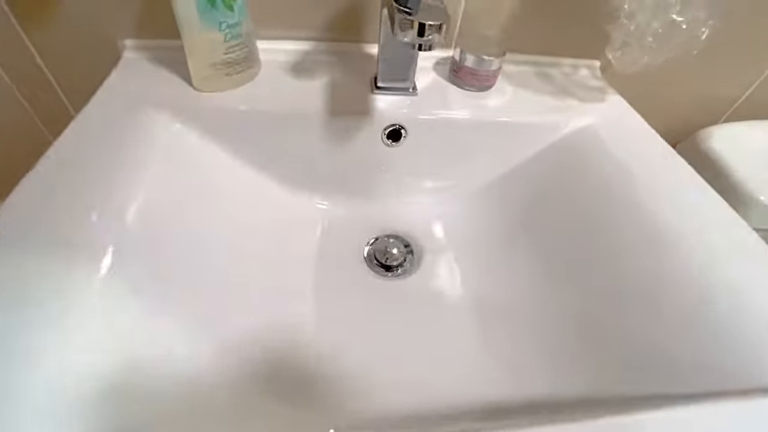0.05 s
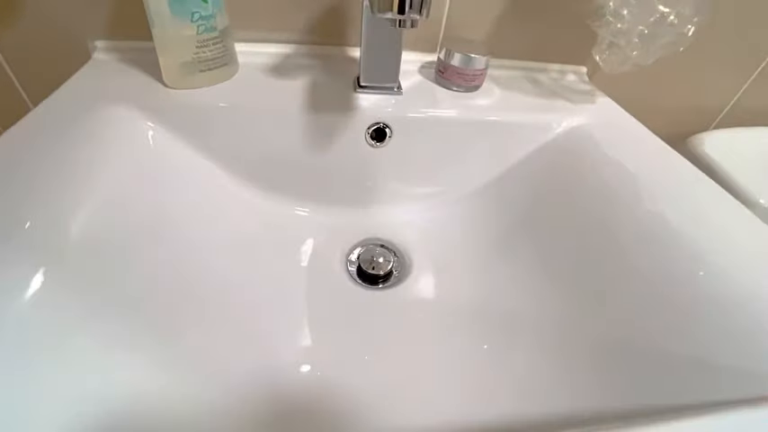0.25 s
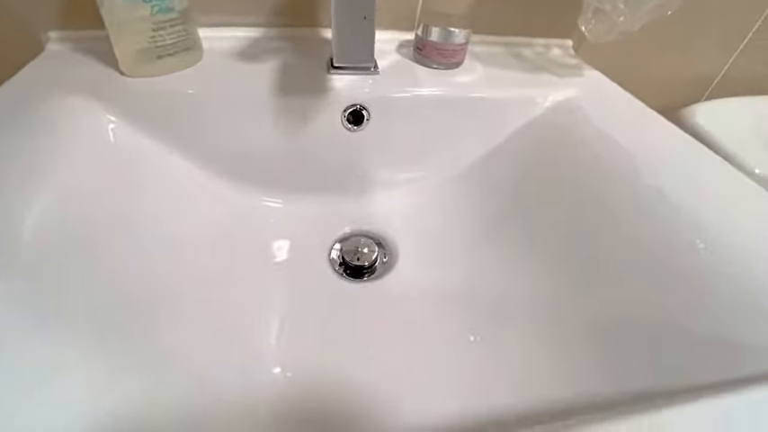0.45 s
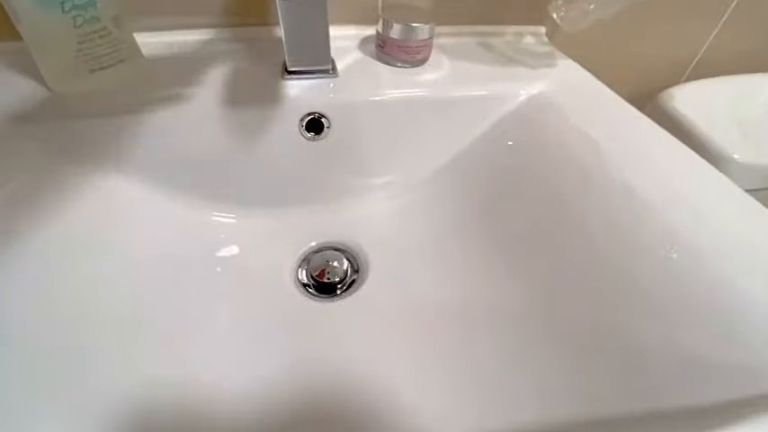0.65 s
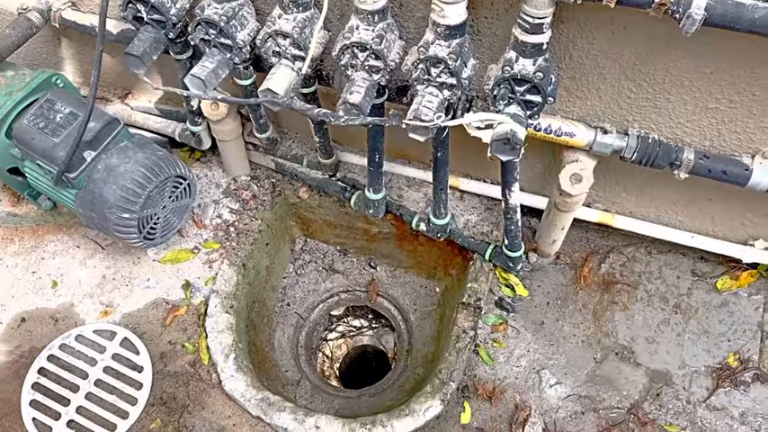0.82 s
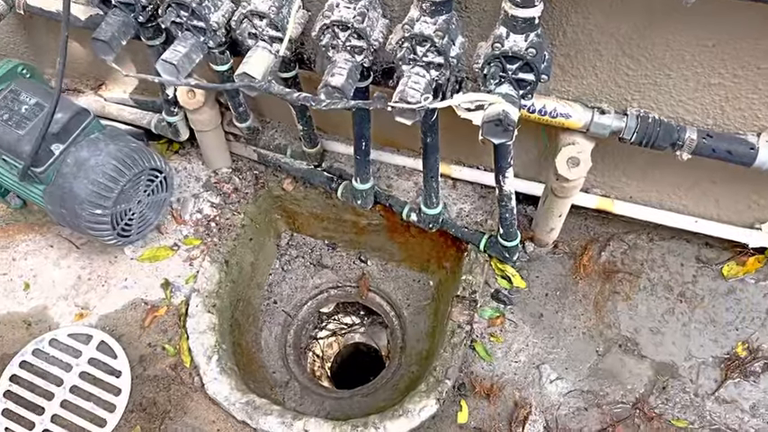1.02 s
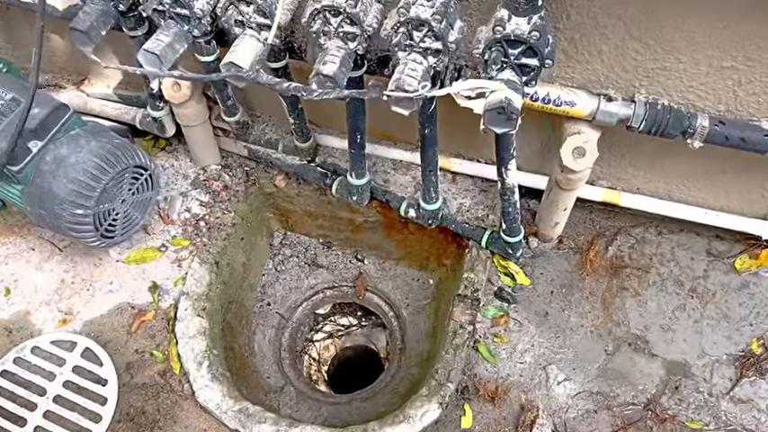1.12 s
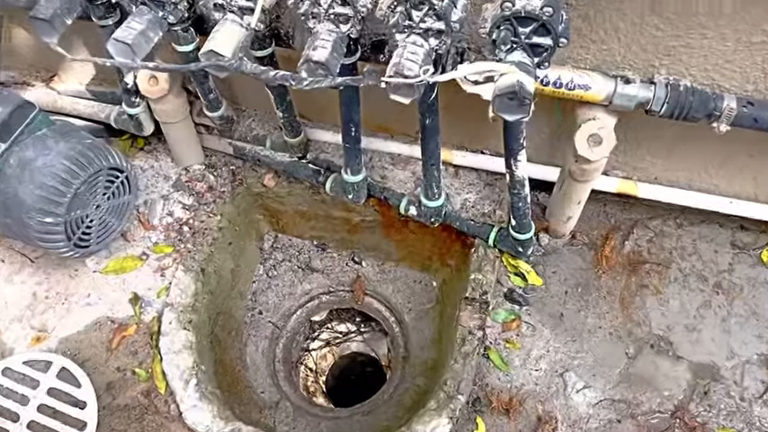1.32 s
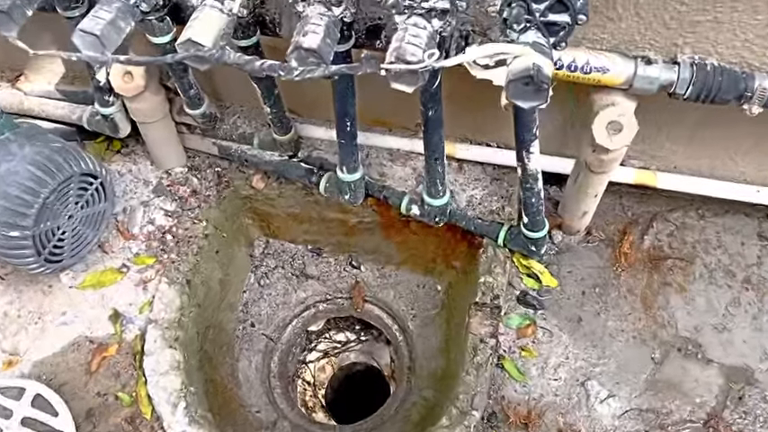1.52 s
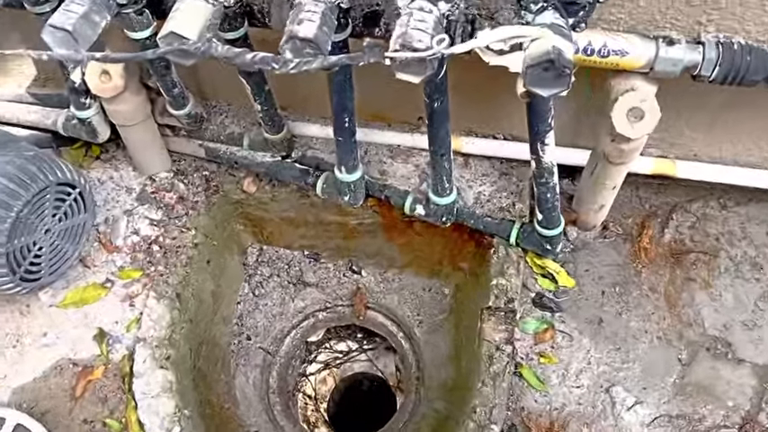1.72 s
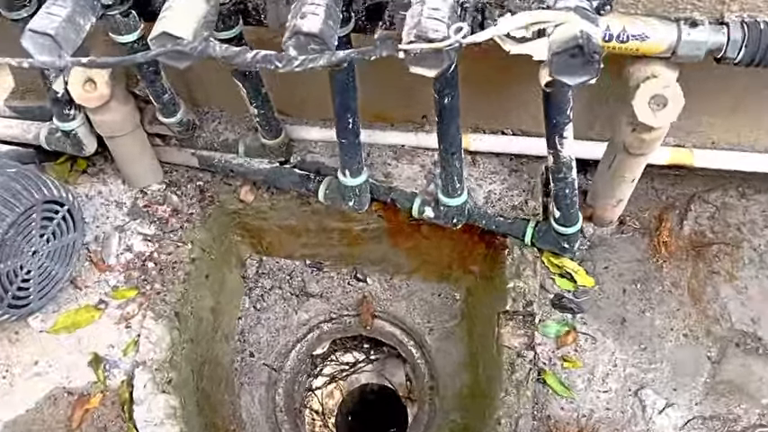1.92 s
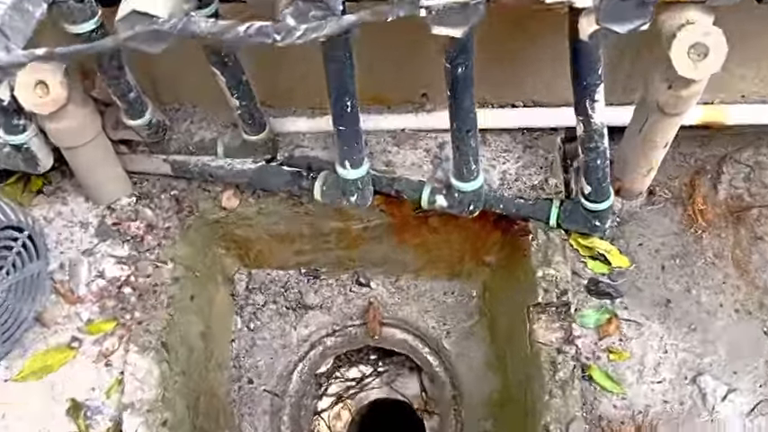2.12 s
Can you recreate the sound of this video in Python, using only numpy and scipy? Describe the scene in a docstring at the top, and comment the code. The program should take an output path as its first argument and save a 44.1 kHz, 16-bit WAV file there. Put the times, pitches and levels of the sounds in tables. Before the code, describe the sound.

A basin drain gurgles briefly, followed by faint outdoor scuffs, drips and a distant hum.

```python
"""Water gurgles down the waste of a basin in a small tiled bathroom: each gulp of air rings a low
pocket and the neck of the pipe and throws spatter, while small bubbles pop over the churning trap.
After a short silence comes a quiet yard by an open drain: shoes scuff on gritty concrete and
drips plop over still air and the low hum of a distant motor. The yard drops out once, briefly."""
import sys
import numpy as np
from scipy import signal
from scipy.fft import rfft, irfft
from scipy.io import wavfile
from scipy.ndimage import map_coordinates

SR = 44100
rng = np.random.default_rng(int(sys.argv[2]) if len(sys.argv) > 2 else 0)


def output_pcm(signal):
    """Save a mono or channel-first signal as 16-bit PCM at the path in sys.argv[1].

    Samples are clipped to [-1, 1] before scaling.
    """
    pcm = np.clip(np.atleast_2d(signal).T, -1, 1) * 32767
    wavfile.write(sys.argv[1], SR, np.round(pcm).astype(np.int16))


N = 94815
T = np.arange(N) / SR
FREQS = np.maximum(np.fft.rfftfreq(N, 1 / SR), 1)
DROPLETS_PER_S = 4500

# Air gulps in the waste: (time [s], pocket pitch [Hz], pocket level [dB], neck pitch [Hz],
# neck level [dB], relative spatter level [dB], relative spray level [dB])
GULPS = [(0.228, 153, -41.5, 500, -67, -62, -82), (0.243, 144.4, -33.5, 530, -42, -62.5, -72.5),
         (0.266, 134.3, -34, 880, -50, -68, -71), (0.289, 319, -32, 590, -34.5, -55.5, -76.5),
         (0.3176, 249, -27, 667, -36.5, -52.5, -77.5), (0.333, 261, -26.5, 500, -46, -62.5, -77),
         (0.341, 476, -25, 680, -27.5, -50.5, -72), (0.351, 265, -35.5, 780, -38, -67.5, -70),
         (0.373, 346, -27, 698, -25.5, -43.5, -61), (0.395, 327, -32.5, 662, -42, -58, -62.5),
         (0.421, 326, -26, 1130, -40.5, -33.5, -54), (0.443, 542, -31.5, 834, -32, -39, -58.5),
         (0.461, 417, -32, 799, -24, -31, -62), (0.482, 323, -35.5, 812, -43, -44, -61.5),
         (0.488, 338.4, -25.5, 690, -46, -63.5, -75.5), (0.503, 345.5, -30.5, 796, -41.5, -50, -49.5),
         (0.538, 332, -30.5, 800, -31, -35.5, -54.5), (0.560, 331, -32.5, 806, -34, -55, -72),
         (0.576, 309, -31, 885, -49, -43.5, -66.5), (0.6, 344, -19.5, 865, -26, -37, -54.5),
         (0.629, 459, -28.5, 847, -30.5, -37, -54.5), (0.649, 345, -18, 873, -30.5, -32, -61.5),
         (0.667, 317, -33, 900, -45.5, -33.5, -58), (0.684, 402, -39.5, 786, -48.5, -63.5, -88.5),
         (0.716, 266.5, -39, 880, -39, -72, -74)]
# Stereo image of each space: (frequency [Hz], left-right likeness [1 = mono])
BATHROOM_IMAGE = [(60, 1), (330, 0.72), (750, 0.39), (1500, 0.029), (4400, 0.061), (15000, -1.1)]
YARD_IMAGE = [(60, 0.94), (200, 0.89), (700, 0.43), (2400, 0.68), (4400, 0.19), (8000, 0.52),
              (14000, -0.27)]


def from_db(db):
    """Decibels to gain."""
    return 10 ** (np.asarray(db) / 20)


def rms_one(x):
    """Scale to unit power."""
    return x / np.sqrt(np.mean(x ** 2) + 1e-20)


def at_hz(points):
    """Read a curve on a log-frequency axis."""
    hz, value = np.transpose(points)
    return np.interp(np.log(FREQS), np.log(hz), value)


def panned(x, pan_db):
    """Place a sound; positive is left."""
    return x * from_db(np.array([[pan_db], [-pan_db]]) / 2)


def from_left(x, lag_s=0.00012):
    """Sound from the left reaches the right microphone a little later."""
    return np.array([x[0], irfft(rfft(x[1]) * np.exp(-2j * np.pi * FREQS * lag_s), N)])


def white():
    """Two unrelated noises."""
    return rng.standard_normal((2, N))


def flutter(width_hz):
    """Two unrelated random wobbles, mostly slower than width_hz."""
    return rms_one(irfft(rfft(white()) * np.exp(-(FREQS / width_hz) ** 2), N))


def grains(per_s):
    """Two trains of random clicks of uneven size, unit power."""
    return rms_one(white() * (rng.random(N) < per_s / SR))


def causal(gain):
    """The filter with these gains that rings only after its input."""
    cepstrum = irfft(np.log(gain + 1e-9), N)
    lag = np.arange(N)
    return np.exp(rfft(cepstrum * (1 + np.sign(lag)) * (lag < N // 2)))


def colour(pair, spectrum, image):
    """Give two unrelated signals a spectrum and a stereo width, keeping their power."""
    mid, side = rfft(pair) * causal(rms_one(from_db(at_hz(spectrum))))
    alike = np.clip(at_hz(image), -.99, .99)
    return irfft(np.sqrt((1 + alike) / 2) * mid + np.sqrt((1 - alike) / 2) * side * [[1], [-1]], N)


def narrow_noise(hz, width_hz):
    """A wavering band of noise round a steady or moving pitch."""
    a, b = flutter(width_hz)
    phase = 2 * np.pi * np.cumsum(hz * np.ones(N)) / SR
    return a * np.cos(phase) + b * np.sin(phase)


def patchy(x, depth_db, patch_s=.035, patch_hz=222.6, full_depth_hz=1190):
    """Short-lived bright spots come and go at random pitches."""
    hz, s, bins = signal.stft(x, SR, nperseg=512)
    grid = np.meshgrid(hz / patch_hz, s / patch_s, indexing="ij")
    spots = map_coordinates(rng.standard_normal(size=(256, 256)), grid, order=2, mode="wrap")
    gain = rms_one(from_db(depth_db * spots * np.minimum(hz / full_depth_hz, 1)[:, None]))
    return signal.istft(bins * gain, SR, nperseg=512)[1][:, :N]


def strike(s, attack, t60):
    """A quick swell and an exponential decay, height 1."""
    age = np.maximum(T - s, 0)
    shape = (1 - np.exp(-(age / attack) ** 2)) * from_db(-60 * np.minimum(age / t60, 2))
    return shape / (shape.max() + 1e-12)


def swell(s, half):
    """A bell-shaped stroke, height 1."""
    return np.exp(-np.minimum(((T - s) / half) ** 2 / 2, 20))


def gate(start, end, fade_in_s=.01, fade_out_s=0.0012):
    """Open between two moments, with short fades."""
    return np.clip((T - start) / fade_in_s, 0, 1) * np.clip((end - T) / fade_out_s, 0, 1)


def bubble(s, hz, db, attack, t60, rise_per_s, squeeze=0):
    """A ringing air pocket: its pitch rises as it nears the surface and wobbles when it is squeezed."""
    age = np.clip(T - s, 0, 2 * t60)
    pitch = hz * (1 + rise_per_s * age + 0.053 * squeeze) * (T > s)
    return from_db(db + squeeze) * strike(s, attack, t60) * np.sin(2 * np.pi * np.cumsum(pitch) / SR)


def reverb(x, spectrum, image, t60):
    """Dense reflections that die away, as strong as the sound itself."""
    decay = strike(0.0011, 0.00099, t60)
    response = colour(white(), spectrum, image) * decay / np.sqrt(np.sum(decay ** 2))
    return signal.fftconvolve(x.mean(axis=0)[None], response[:, :SR // 2], axes=1)[:, :N]


def room_tone():
    """The faint rumble and hiss of the bathroom."""
    # Room tone colour: (frequency [Hz], relative level [dB])
    tone = [(18, -46), (30, -27), (260, -9), (328, -22), (953, -17.5), (1270, -16), (1480, -16.5),
            (2700, -16.5), (15000, -36)]
    return from_db(-68) * colour(white(), tone, BATHROOM_IMAGE)


def yard_air():
    """Still outdoor air: a low rumble under a flickering hiss."""
    # Colour of the outdoor hiss as heard through the microphone, with a narrow notch at 12.5 kHz:
    # (frequency [Hz], relative level [dB])
    tone = [(18, -28.5), (30, -7.5), (180, -9), (288, -17.5), (928, -24), (2990, -27), (3230, -27.5),
            (4090, -28), (5880, -34.5), (8470, -34), (10700, -33.5), (12500, -56), (15000, -33.5)]
    return from_db(-63) * patchy(colour(white(), tone, YARD_IMAGE), depth_db=5.0)


def motor_hum():
    """A distant motor drones in three wavering bands, off to the right."""
    # Hum bands: (pitch [Hz], relative level [dB], width [Hz])
    bands = [(54, -69.5, 11), (149.8, -68, 15.3), (330, -81, 19)]
    # Slow drift of the hum: (time [s], gain [dB])
    drift = [(.85, -3), (1.15, 1), (1.3, 4), (1.5, 5), (1.62, 2.5), (2.15, 4)]
    hum = sum(from_db(db) * narrow_noise(hz, width) for hz, db, width in bands)
    return panned(hum * from_db(np.interp(T, *np.transpose(drift))), pan_db=-4.0)


def drips():
    """Drips plop in the open drain, each ringing as a bubble."""
    # Plops: (time [s], pitch [Hz], level [dB], ring time to -60 dB [s])
    plops = [(1.134, 4050, -56, 0.092), (1.223, 4100, -64, .05), (1.282, 1322, -55, 0.041),
             (1.36, 854, -48.5, 0.036), (1.502, 847, -52, 0.043), (1.548, 4300, -63, .04),
             (1.647, 191, -57, 0.11), (1.755, 5540, -61, .03), (1.775, 1211, -53.5, 0.12),
             (1.85, 1164, -55, 0.1), (1.849, 3243, -50.5, 0.027), (2.069, 1670, -48.5, 0.03)]
    return sum(bubble(s, hz, db, attack=0.0052, t60=t60, rise_per_s=0.28) for s, hz, db, t60 in plops)


def shoe_scuffs(swish_s=2.040, swish_hz=3750, fall_octaves_per_s=26.8):
    """Shoes crunch grit, rub, scrape and knock dully; a falling swish leads into the last scuffs."""
    # Strokes on concrete: (time [s], half length [s], grit [dB], rub [dB], scrape [dB], knock [dB])
    strokes = [(0.95, 0.012, -59, -59.5, -63.5, -77), (0.999, 0.017, -68, -67.5, -55.5, -65),
               (1.049, 0.014, -53.5, -57.5, -53.5, -63), (1.11, 0.03, -61.5, -62, -52.5, -77),
               (1.18, .011, -58.5, -65, -67.5, -80), (1.404, 0.013, -65, -62.5, -65, -85),
               (1.5, 0.023, -62, -61.5, -61, -70), (1.544, 0.022, -85, -63.5, -88, -80),
               (1.615, 0.0072, -72, -83, -63.5, -81), (1.728, 0.034, -68, -65, -84, -78),
               (1.811, 0.012, -53, -59, -58, -59), (1.855, 0.01, -54.5, -56.5, -54.5, -51),
               (1.918, 0.01, -53, -55, -81, -66.5), (2.064, 0.019, -62.5, -60, -87, -80),
               (2.082, 0.0065, -45.5, -56, -59, -67.5), (2.091, 0.0024, -62, -51, -63, -49),
               (2.122, 0.0026, -63, -79, -87, -82)]
    # Colours of the four layers as heard through the microphone, notched at 6.3 and 12.5 kHz:
    # (frequency [Hz], relative level [dB])
    grit = [(3000, -10), (6300, -12), (7500, 0), (8600, 0), (9600, -5), (11200, -4.5), (12500, -39),
            (13600, -8.5), (15300, -8)]
    rub = [(900, -24.5), (1800, -0.5), (2600, -7.5), (3300, 2.5), (4600, 2.5), (5400, -3), (6400, -14.5),
           (12000, -34)]
    scrape = [(200, -22.5), (480, 0), (650, -6), (850, 6), (1050, -6), (1300, -4.5), (2200, -14.5),
              (5000, -30), (12000, -47)]
    knock = [(80, -18), (250, -12), (380, -4.5), (490, 0), (650, -18), (2000, -26), (8000, -64)]
    scuffs = 0
    for k, tone in enumerate((grit, rub, scrape, knock)):
        power = sum((from_db(levels[k]) * swell(s, half)) ** 2 for s, half, *levels in strokes)
        scuffs += colour(grains(per_s=9000) * np.sqrt(power), tone, YARD_IMAGE)
    glide_hz = swish_hz * 2 ** np.clip(fall_octaves_per_s * (swish_s - T), -2, .4)
    swish = from_db(-64) * swell(swish_s, half=0.022) * narrow_noise(glide_hz, width_hz=350)
    return patchy(scuffs + swish, depth_db=5.5)


def running_water(first_slurp_hz=3370, last_slurp_hz=606):
    """A few slurps, each lower than the last, then the churn in the trap."""
    # Flow through the trap: (time [s], level [dB])
    flow = [(0, -68.5), (.09, -68), (.11, -51.5), (.145, -52), (.17, -55), (.22, -53.5), (.26, -42.5),
            (.34, -38.5), (.5, -42.5), (.66, -48), (.72, -51)]
    # Flow colour: (frequency [Hz], relative level [dB])
    tone = [(30, -12), (70, -2), (140, 4), (250, 2), (500, -5), (900, -12.5), (1600, -24.5), (4500, -45.5),
            (7000, -40.5), (15000, -61.5)]
    # Slurps as the flow starts: (time [s], half length [s], level [dB])
    slurps = [(.102, 0.0036, -51), (0.112, 0.0032, -52.5), (0.135, 0.02, -51)]
    water = colour(grains(DROPLETS_PER_S), tone, BATHROOM_IMAGE)
    water *= from_db(np.interp(T, *np.transpose(flow)))
    for (s, half, db), hz in zip(slurps, np.geomspace(first_slurp_hz, last_slurp_hz, len(slurps))):
        band = [(hz / 8, -20), (hz / 2, -3), (hz, 0), (hz * 2, -10), (hz * 8, -28)]
        water += from_db(db) * swell(s, half) * colour(grains(DROPLETS_PER_S), band, BATHROOM_IMAGE)
    return patchy(water, depth_db=3.0)


def bubble_pops(ring_cycles=32):
    """Small bubbles burst with a clear ring, off to the left."""
    # Bursting bubbles: (time [s], pitch [Hz], level [dB])
    pops = [(0.391, 7040, -58.5), (0.423, 1910, -37.5), (0.444, 2050, -55), (0.462, 1954, -34.5),
            (0.462, 1180, -35.5), (0.465, 4030, -37.5), (0.483, 2645, -43.5), (0.506, 5200, -52.5),
            (0.540, 3120, -47.5), (0.576, 2610, -35.5), (0.602, 4900, -32.5), (0.602, 2122, -40),
            (0.651, 3130, -41.5), (0.668, 3840, -39)]
    rings = sum(bubble(s, hz, db, attack=0.0011, t60=ring_cycles / hz, rise_per_s=6)
                for s, hz, db in pops)
    return panned(rings, pan_db=5.5)


def spatter(lead_s=0.0026):
    """Just before it rings, each gulp throws droplets inside the pipe and a fine spray out of it."""
    # Colours of the pipe and of the spray: (frequency [Hz], relative level [dB])
    pipe_tone = [(300, -15.5), (700, 9), (1150, -13.5), (1400, 3), (1950, 4), (2400, 0.5), (2650, 6),
                 (2900, -2), (3180, 6.5), (3550, -7), (3850, -1.5), (4400, -3.5), (4950, -5.5),
                 (5900, -17.5), (9000, -43.5), (14000, -39.5)]
    spray_tone = [(2000, -18.5), (5200, 16.5), (6500, -7), (9500, 1.5), (12500, -5), (15000, -5.5)]
    # Stereo image of the droplets: (frequency [Hz], left-right likeness [1 = mono])
    image = [(500, 1), (8000, 0.28)]
    pipe_envelope, spray_envelope = 0, 0
    for s, *_, spatter_db, spray_db in GULPS:
        burst = strike(s - lead_s, attack=0.0047, t60=0.041)
        pipe_envelope += from_db(spatter_db - 7) * burst
        spray_envelope += from_db(spray_db + 0.5) * burst
    in_pipe = colour(grains(DROPLETS_PER_S) * pipe_envelope, pipe_tone, image)
    spray = colour(grains(DROPLETS_PER_S) * spray_envelope, spray_tone, image)
    return in_pipe + spray


def gulp_rings(ring_cycles=13.5):
    """Each gulp rings a low air pocket and the neck of the waste; churning water squeezes both."""
    pockets, necks = 0, 0
    churn = flutter(width_hz=130)
    for s, hz, db, neck_hz, neck_db, *_ in GULPS:
        pockets += bubble(s, hz, db, attack=0.94 / hz, t60=ring_cycles / hz,
                          rise_per_s=0.88, squeeze=churn[0])
        necks += bubble(s, neck_hz, neck_db, attack=1.56 / neck_hz, t60=ring_cycles / neck_hz,
                        rise_per_s=3.6, squeeze=churn[1])
    return panned(pockets, pan_db=-4) + panned(necks, pan_db=4.5)


def gurgle():
    """Gulps, pops and spatter leave the waste and bounce off the tiles."""
    # Colour of the reflections: (frequency [Hz], relative level [dB])
    tiles = [(60, 3), (140, -4.5), (330, 6.5), (800, 3), (3000, -2.5), (15000, 0.5)]
    rings = gulp_rings()
    splashes = bubble_pops() + spatter()
    send = from_db(-8) * rings + from_db(-7) * splashes
    return from_left(rings + splashes) + reverb(send, tiles, BATHROOM_IMAGE, t60=0.17)


def scene():
    """The bathroom, a silence, then the walled yard, which drops out once."""
    bathroom = gurgle() + running_water() + room_tone()
    near = shoe_scuffs() + drips()
    bed = motor_hum() + yard_air()
    walls = from_db(-8.5) * reverb(near, [(1000, -2), (10000, -8)], YARD_IMAGE, t60=0.093)
    yard = near + walls + bed
    return bathroom * gate(-1, .726) + yard * (gate(.852, 1.954) + gate(1.995, 10))


def record(dry):
    """A steep low-pass cuts the top above 15.6 kHz."""
    return signal.sosfilt(signal.ellip(10, .2, 80, 15600, fs=SR, output="sos"), dry)


dry = scene()
out = record(dry)
output_pcm(out)
```